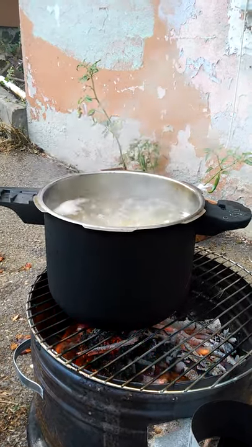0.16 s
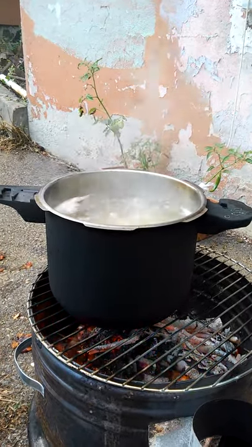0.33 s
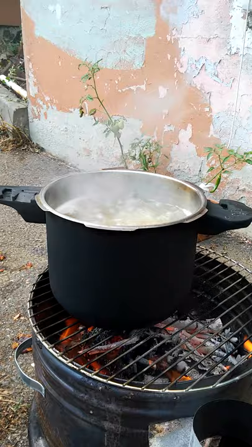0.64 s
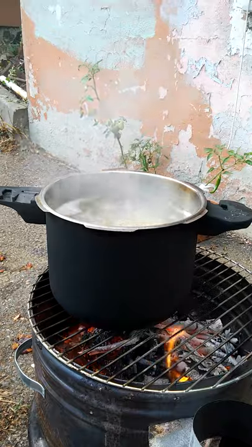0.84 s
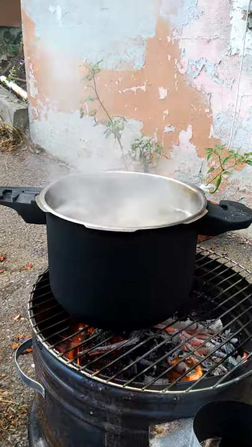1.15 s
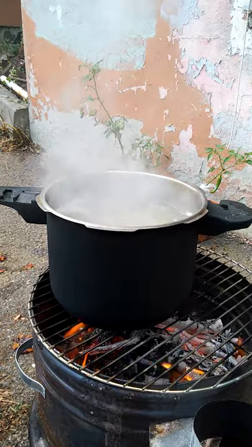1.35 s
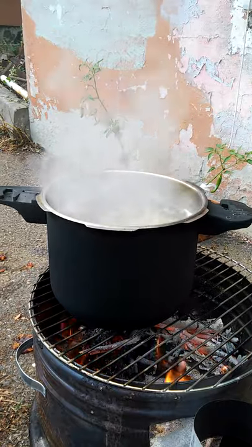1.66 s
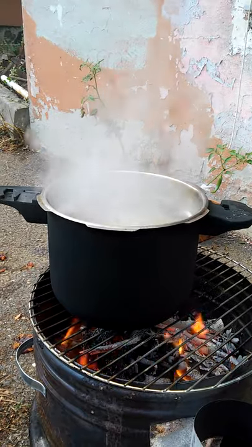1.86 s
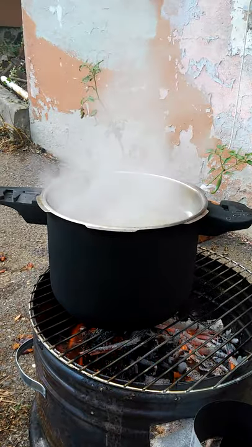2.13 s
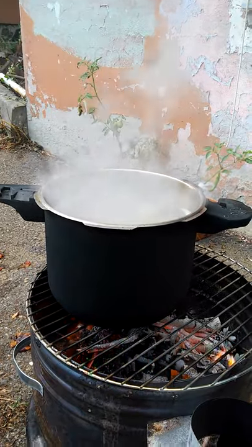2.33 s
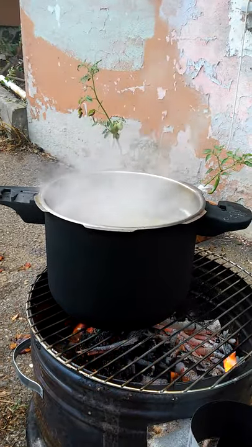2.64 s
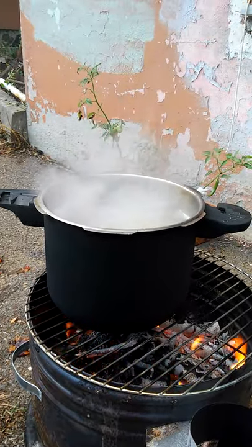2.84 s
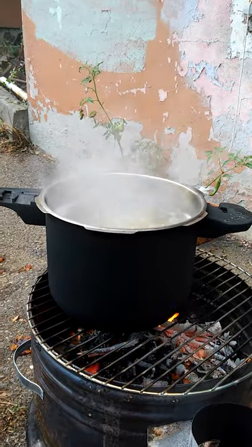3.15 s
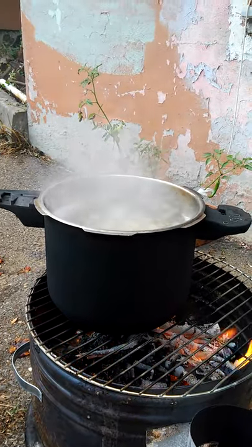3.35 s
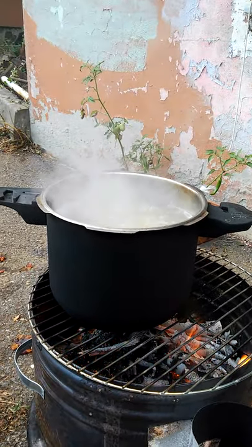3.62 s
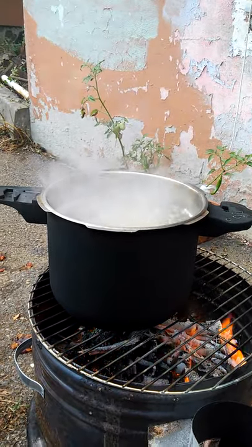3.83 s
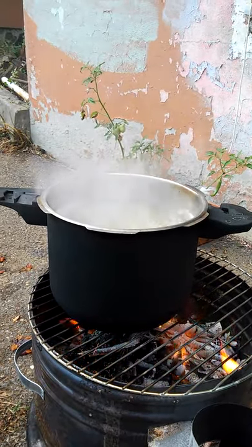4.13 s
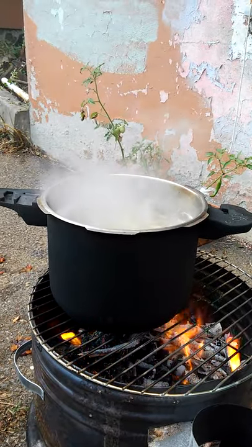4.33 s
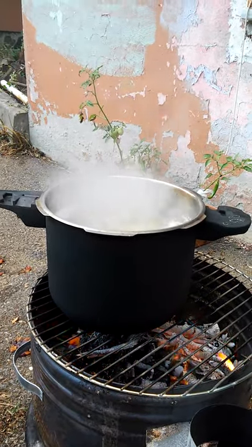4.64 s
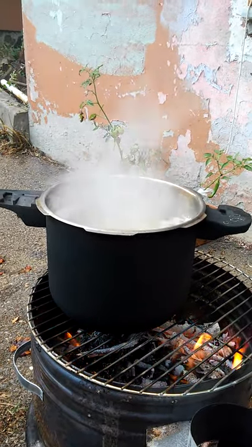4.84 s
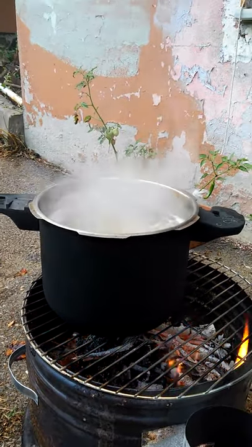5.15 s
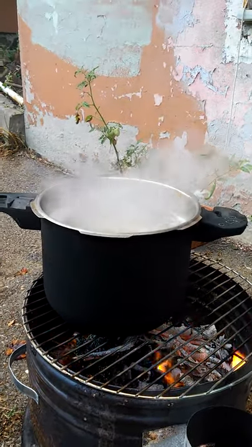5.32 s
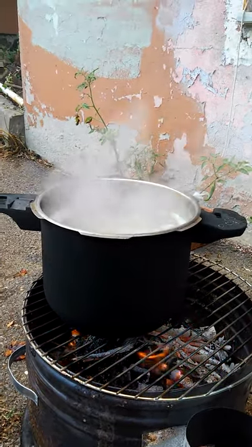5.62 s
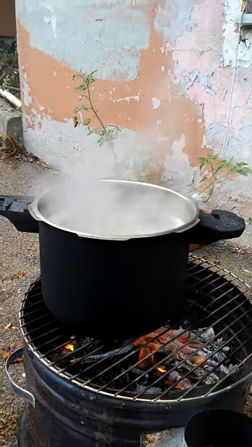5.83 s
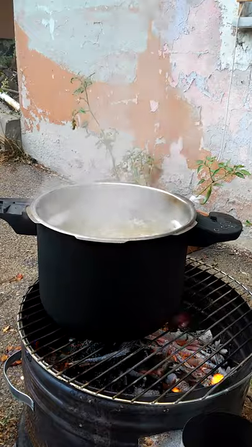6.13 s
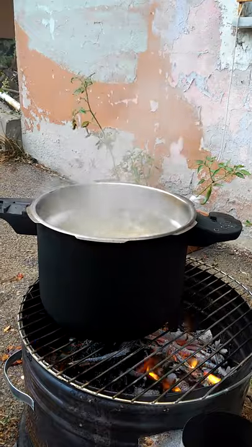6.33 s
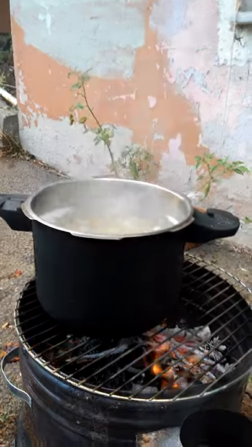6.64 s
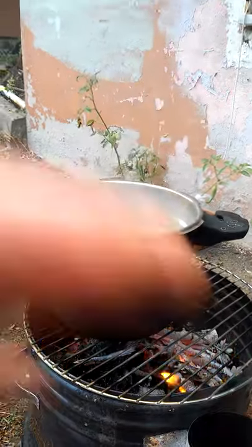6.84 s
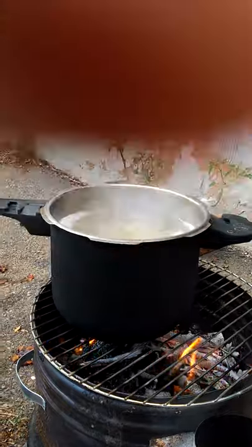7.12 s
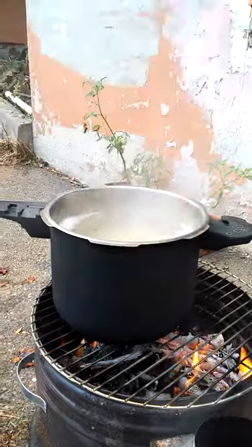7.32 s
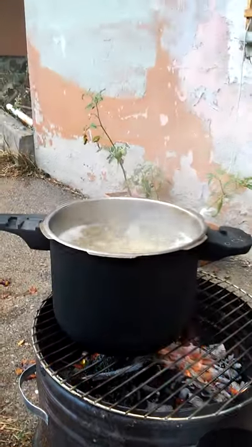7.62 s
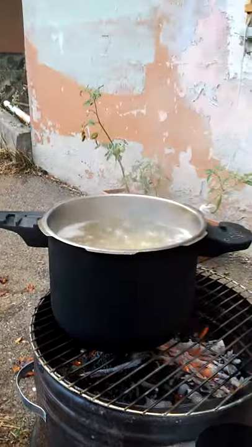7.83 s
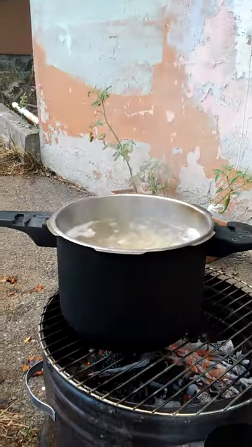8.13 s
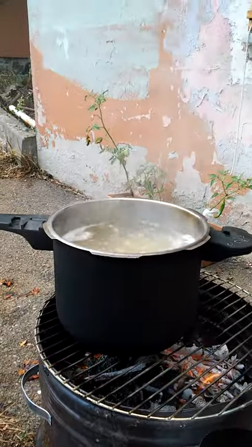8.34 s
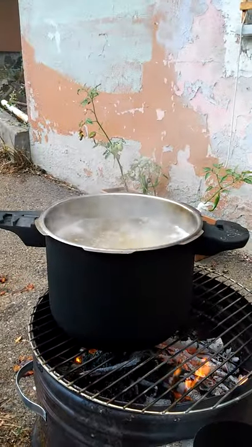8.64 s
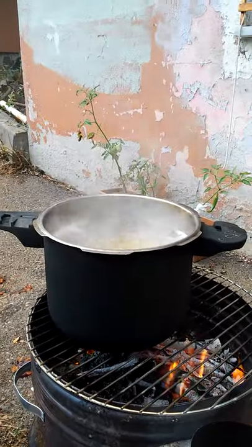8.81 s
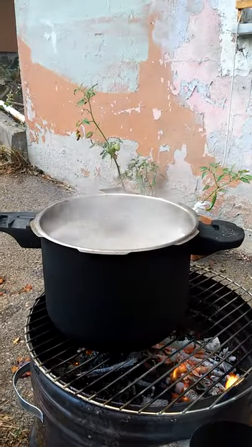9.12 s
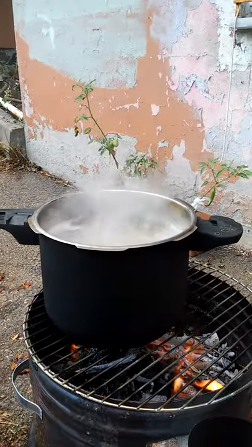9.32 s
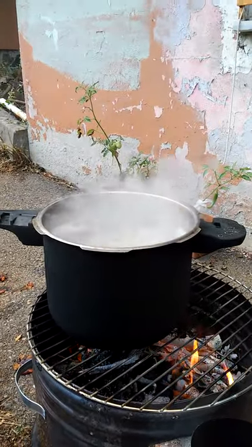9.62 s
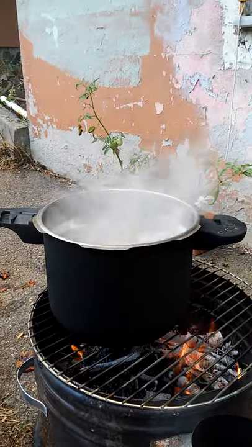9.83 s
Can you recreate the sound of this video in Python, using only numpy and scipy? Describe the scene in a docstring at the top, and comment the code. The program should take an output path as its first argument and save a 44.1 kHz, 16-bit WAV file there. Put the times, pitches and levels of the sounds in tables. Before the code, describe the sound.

Heard up close in a yard, embers sizzle and snap under a gently bubbling pot while an insect chirrs thinly. The grill grate clanks at the start, and soft thumps follow. Midway the wood gives faint whistles and a sharp crack. Then come another hard crack and short hissing jets of steam over a faint distant engine, before a loud pop resonates in the steel drum.

```python
"""A wood and charcoal fire in a steel drum outdoors, under a grate and a boiling pot, heard close by.
At first the grate clanks with a low thud; soft low thumps follow. Throughout, flames and water roar
softly, bubbles ring, embers sizzle and crack, and an insect chirrs with its wings. Midway, gas whistles
thinly from the wood; later steam spurts from its pores while an engine drones far off.
Near the end a loud pop knocks the drum and excites its resonances."""
import sys
import numpy as np
from scipy import signal
from scipy.fft import rfft, irfft, next_fast_len
from scipy.io import wavfile
from scipy.ndimage import uniform_filter1d, map_coordinates

SR = 44100
rng = np.random.default_rng(int(sys.argv[2]) if len(sys.argv) > 2 else 0)


def log_audio(samples):
    """Write samples as a 16-bit WAV file to the path given in sys.argv[1]."""
    # one column per channel
    frames = np.atleast_2d(samples).T
    # limit to full scale, then quantise
    limited = np.clip(frames, -1, 1)
    pcm = np.round(limited * 32767).astype(np.int16)
    wavfile.write(sys.argv[1], SR, pcm)


N = 439677

# The background roar and sizzle swell and sink together.
# Each row: time in seconds, roar in dB, sizzle in dB.
BACKGROUND_LEVELS = [(0.0, -62, -62), (0.14, -57, -59), (0.36, -59.5, -62), (0.6, -70, -71.5),
                     (1.1, -74.5, -76), (1.45, -72.5, -74.5), (1.8, -73.5, -78.5), (2.19, -69.5, -73),
                     (2.52, -68, -68.5), (2.95, -70, -72), (3.28, -64, -64), (3.58, -64, -69),
                     (3.95, -71, -72.5), (4.3, -65, -63), (4.55, -64, -62.5), (5.38, -70, -71),
                     (5.8, -67.5, -66.5), (6.07, -62.5, -61.5), (6.45, -67.5, -67), (7.05, -64, -60.5),
                     (7.5, -64.5, -62.5), (7.75, -59, -56.5), (8.05, -60, -61), (8.42, -66.5, -62.5),
                     (8.66, -62.5, -60), (8.86, -68, -68), (9.24, -66.5, -65), (9.77, -65.5, -65.5),
                     (9.97, -55.5, -58.5)]


def amp(db):
    """Amplitude ratio of a level in decibels."""
    return 10 ** (np.asarray(db) / 20)


def unit(x):
    """Normalisation to rms 1."""
    return x / np.sqrt(np.mean(x ** 2) + 1e-20)


def peak(x):
    """Normalisation to peak 1."""
    return x / np.abs(x).max()


def along(points, hz):
    """Interpolation of (Hz, value) points on a logarithmic frequency axis."""
    f, values = np.transpose(points)
    return np.interp(np.log(hz + 1), np.log(f + 1), values)


def curves(rows):
    """Linear interpolation in time: one value per sample for each column after the first."""
    times, *columns = np.transpose(rows)
    return [np.interp(np.arange(N) / SR, times, column) for column in columns]


def wobble(rate):
    """Smooth random modulation: a spline through `rate` knots a second."""
    knots = rng.standard_normal(int(N * rate / SR) + 4)
    grid = np.arange(0, N + 16, 16)
    return np.interp(np.arange(N), grid, map_coordinates(knots, [grid * rate / SR]))


def band(f, centre_hz, width_hz):
    """Frequency response of a damped resonator."""
    return 1j * f * width_hz / (centre_hz * centre_hz - f * f + 1j * f * width_hz)


def filtered(x, response):
    """Linear filtering: the spectrum of x times a frequency response."""
    size = next_fast_len(x.shape[-1] + min(x.shape[-1] // 2, 8192))
    return irfft(rfft(x, size) * response(np.fft.rfftfreq(size, 1 / SR)), size)[..., :x.shape[-1]]


def add(track, start, sound):
    """Superposition of a sound on a track, from `start` seconds."""
    part = track[max(round(start * SR), 0):][:len(sound)]
    part += sound[:len(part)]


def rush(spectrum, patchy_db, spit_db):
    """Coloured noise of rms 1, modulated by a fast sputter and by patches in time and frequency."""
    sputter = rng.standard_normal(N) * amp(spit_db * wobble(900))
    cells = signal.stft(sputter, nperseg=512)[2]
    patches = uniform_filter1d(rng.standard_normal(cells.shape), size=6, axis=0)
    patches = uniform_filter1d(patches, size=12, axis=1)
    noise = signal.istft(cells * amp(patchy_db * unit(patches)), nperseg=512)[1][:N]
    return unit(filtered(noise, lambda hz: amp(along(spectrum, hz))))


def ring(modes, t, rise_s, blur_hz):
    """A sum of damped modes; phase diffusion broadens each spectral line."""
    phase = 2 * np.pi * rng.random((len(modes), 1))
    drift = np.cumsum(rng.standard_normal((len(modes), len(t))), axis=1) * np.sqrt(2 * np.pi * blur_hz / SR)
    hz, db, t60 = np.transpose(modes)[:, :, None]
    partials = amp(db - 60 * t / np.maximum(t60, .005)) * np.sin(2 * np.pi * hz * t + phase + drift)
    return partials.sum(axis=0) * (1 - np.exp(-t / rise_s))


def engine():
    """A distant engine: one low tone, randomly modulated in amplitude and frequency."""
    # Each row: time in seconds, pitch in Hz, level in dB.
    drone = [(6.9, 57.2, -83), (7.1, 56.8, -63), (7.4, 56.9, -65.5), (7.7, 57, -57), (8, 56.95, -63),
             (8.3, 57.1, -64), (8.7, 56, -65), (8.95, 55.8, -84)]
    hz, db = curves(drone)
    return amp(db + 3.2 * wobble(19)) * np.sin(2 * np.pi * np.cumsum(hz + 3 * wobble(12)) / SR)


def insect():
    """Amplitude modulation: wing strokes chop a high hiss, which swells once a syllable."""
    # Each row: time in seconds, level at the height of a syllable in dB.
    chirr = [(0.0, -52.5), (0.3, -54.5), (0.65, -69.5), (1.2, -72), (1.8, -71.5), (2.1, -64.5), (2.6, -62),
             (2.8, -65), (3.1, -57), (3.52, -53), (3.95, -66), (4.07, -66.5), (4.13, -57), (4.5, -53),
             (5.1, -60), (5.6, -59.5), (6.04, -49.5), (6.3, -55.5), (6.9, -52.5), (7.8, -50), (8.4, -51.5),
             (8.7, -57), (8.93, -75), (8.98, -55.5), (9.44, -52), (9.75, -53), (9.97, -48)]
    # Each row: time in seconds, syllables sung so far.
    syllables = [(0.14, 0), (0.79, 4), (1.41, 8), (2.05, 12), (2.92, 18), (3.85, 24), (4.12, 26), (4.9, 31),
                 (5.6, 35), (6.04, 38), (7.53, 48), (8.2, 52), (9.0, 57), (10.025, 64)]
    # The hiss. Each row: frequency in Hz, spectral level in dB.
    wings = [(9000, -40.5), (12500, -21), (14000, -10), (15000, -1.5), (15600, 3), (15900, -11)]
    strokes = np.cos(2 * np.pi * np.cumsum(125 + 6 * wobble(8)) / SR)
    depth_db = 9 * np.abs(.85 + 0.37 * wobble(5.5))
    pauses = np.abs(np.sin(np.pi * curves(syllables)[0])) ** 3
    hiss = unit(amp(1.4 * strokes) * rush(wings, patchy_db=1.5, spit_db=0.5))
    return amp(curves(chirr)[0] - depth_db * pauses) * hiss


def roar_and_sizzle():
    """Broadband noise in three bands: flames rumble, water roars in the pot, embers sizzle."""
    # Three spectra. Each row: frequency in Hz, spectral level in dB.
    flames = [(12, -30), (20, -6), (28, -9), (52, 0), (90, -4), (150, -10), (210, -31), (350, -120)]
    water = [(35, -27), (60, -5), (110, -2), (170, -2), (250, -5), (450, -4.5), (560, -8), (1040, -10),
             (1440, -18.5), (2470, -21.5), (4410, -23.5), (6000, -26.5), (7800, -49.5), (13200, -120)]
    coals = [(3500, -40.5), (5300, -12), (6300, -5.5), (7500, -1), (9000, -3.5), (12000, -2), (14000, 0.5),
             (15800, -8)]
    # Each row: time in seconds, rumble relative to the roar in dB.
    flutter = [(0, -8), (0.2, -14), (0.5, -6), (1.6, -3.5), (2.3, -8), (2.9, -13), (3.6, -3.5), (4.0, -7),
               (4.5, -4), (5.8, -5.5), (6.2, -9), (7.5, -10), (8.0, -3), (8.6, -3), (9.1, -6.5),
               (9.97, -12)]
    roar_db, sizzle_db = curves(BACKGROUND_LEVELS)
    rumble_db = roar_db + curves(flutter)[0]
    rumble = amp(rumble_db + 1.7 * wobble(6.2)) * rush(flames, patchy_db=0.1, spit_db=0.5)
    roar = amp(roar_db + 0.87 * wobble(12)) * rush(water, patchy_db=0.16, spit_db=0.73)
    sizzle = amp(sizzle_db + 1.2 + 1.6 * wobble(20)) * rush(coals, patchy_db=1.0, spit_db=1.4)
    return rumble + roar + sizzle


def bubbles():
    """Steam bubbles burst in the pot, each a damped oscillator of rising pitch."""
    # Each row: start in seconds, level in dB, initial pitch in Hz.
    big = [(3.015, -54, 175), (3.075, -51, 160), (3.2, -55, 180), (3.285, -50, 138), (3.355, -53, 190),
           (3.47, -54, 125), (3.6, -52, 150), (3.75, -48, 155)]
    typical_hz, life_cycles = 170.3, 6.1
    out, roar_db = np.zeros(N), curves(BACKGROUND_LEVELS)[0]
    small = [(when * N / SR, roar_db[int(when * N)] + 5 + 7 * size,
              typical_hz * 2 ** (2.2 * pitch ** 2 - .6)) for when, size, pitch in rng.random((110, 3))]
    for start, db, hz in big + small:
        cycles = np.arange(SR // 10) / SR * hz
        envelope = amp(db) * (1 - np.exp(-cycles)) * np.exp(-3 * cycles / life_cycles)
        add(out, start, envelope * np.sin(2 * np.pi * cycles * (1 + .025 * cycles)))
    return out


def low_thumps():
    """Heavily damped oscillations of a cycle or two: the thud of the grate, then soft low thumps."""
    # Each row: start in seconds, level in dB, pitch in Hz.
    thumps = [(.038, -26, 220), (.972, -38.5, 89), (1.25, -41.5, 45), (1.485, -48.5, 64.7),
              (3.746, -38.5, 290), (8.101, -30, 284), (8.478, -36.5, 105), (8.52, -50, 75)]
    out = np.zeros(N)
    for start, db, hz in thumps:
        cycles = np.arange(int(6 * SR / hz)) * hz / SR
        add(out, start, amp(db) * cycles * np.exp(-1.4 * cycles) * np.sin(2 * np.pi * cycles))
    return out


def whistles():
    """Gas leaving the wood sounds faint narrow-band tones that swell and fade."""
    # Each row: start in seconds, length in seconds, pitch in Hz, level in dB.
    tones = [(3.4, .15, 4050, -81), (6.03, 0.14, 4060, -74)]
    out = np.zeros(N)
    for start, length, hz, db in tones:
        t = np.arange(round(length * SR)) / SR
        swell = amp(db) * np.sin(np.pi * t / length)
        add(out, start, swell * ring([(hz, 0, 9)], t, rise_s=.01, blur_hz=70))
    return out


def steam_jets():
    """Jet noise: pores in the wood open and shut on a hiss with a low spill and a fine top."""
    # Each row: start and length in seconds, first and last level in dB, relative spill and top in dB.
    spurts = [(6.622, .068, -56, -53.5, -23, -12), (6.69, 0.16, -61, -66.5, -20, -10),
              (6.979, .25, -58, -63, -15, -9.5), (7.488, .045, -53, -64, -19, -7),
              (7.587, 0.1083, -36, -34, -23.5, 1), (7.694, .056, -32.5, -36, -21, 1),
              (7.747, .155, -44.5, -41, -23.5, 2.5), (7.91, .2, -59.5, -68.5, -24, -3),
              (8.435, .06, -53.5, -59, -17, 1), (8.49, .075, -55, -49.5, -23, -1),
              (8.56, .045, -48, -35.5, -22.5, -2), (8.599, 0.084, -35, -32, -18, -2.5),
              (8.695, 0.09, -55, -67, -22, -6), (9.34, .11, -63.5, -65.5, -18, -14)]
    # Three spectra. Each row: frequency in Hz, spectral level in dB.
    steam_band = [(3500, -45.5), (5000, -20.5), (5700, -16), (6500, -5), (7600, -1.5), (8500, -4.5),
                  (9500, -9.5), (11000, -33)]
    spill_band = [(900, -29), (1500, -13.5), (2300, -13), (3300, -1.5), (4100, -9.5), (5000, 0),
                  (6000, -31)]
    top_band = [(7500, -35.5), (9000, -3.5), (10300, -4.5), (11500, -1.5), (13000, -4), (14600, 0),
                (15800, -3.5)]
    open_s, shut_s = 0.008, 0.0031
    flow, spill, top = np.zeros((3, N))
    for start, length, first_db, last_db, spill_db, top_db in spurts:
        t = np.arange(round((length + 8 * shut_s) * SR)) / SR
        opening = np.tanh((t / open_s) ** 2) * np.exp(-np.maximum(t - length, 0) / shut_s)
        spurt = amp(first_db + (last_db - first_db) * t / length) * opening
        add(flow, start, spurt)
        add(spill, start, amp(spill_db) * spurt)
        add(top, start, amp(top_db) * spurt)
    hiss = flow * rush(steam_band, patchy_db=2.0, spit_db=1.5)
    hiss += spill * rush(spill_band, patchy_db=3.5, spit_db=1.5)
    return amp(1.2 * wobble(40)) * (hiss + top * rush(top_band, patchy_db=2.5, spit_db=1.5))


def yard(x):
    """Diffuse reverberation: convolution with a short noise tail whose treble dies first."""
    # Each row: frequency in Hz, time to fall 60 dB in seconds.
    decay_times = [(300, 0.34), (1000, 0.33), (3000, 0.21), (8000, 0.18), (15000, 0.069)]
    hz, t, cells = signal.stft(rng.standard_normal(SR // 2), SR, nperseg=256)
    tail = signal.istft(cells * amp(-60 * t / along(decay_times, hz)[:, None]), SR, nperseg=256)[1]
    return signal.fftconvolve(x, tail / np.linalg.norm(tail))[:N]


def grate_clank():
    """Impact excitation: a few quick contacts set the modes of the grate ringing."""
    # Each row: frequency in Hz, level in dB, time to fall 60 dB in seconds.
    modes = [(490, -35, 1.4), (740, -16, 0.24), (952, -11, 0.26), (1023, -5.5, 0.32), (1114, -17, 0.53),
             (1697, -30, 0.41), (1808, -25.5, 0.36), (1970, -31, 0.44), (2330, -14, 0.21),
             (2630, -18.5, 0.24), (2726, -15, 0.25), (2863, -22, 0.18), (3016, -5.5, 0.19),
             (3266, -12.5, 0.23), (3451, -28, 0.3), (3510, -14, 0.22), (3630, -17, 0.243),
             (4290, -10.5, 0.087), (4470, -20, 0.19), (4760, -11, 0.089), (5260, -13.5, 0.19),
             (5320, -8, 0.084), (6170, -6.5, 0.076), (6400, -11.5, 0.12), (7160, -13, 0.2),
             (8177, -15, 0.088)]
    # Each row: start in seconds, level in dB.
    contacts = [(0.0359, -28.5), (.045, -26), (.053, -31), (0.063, -44)]
    out, t = np.zeros(N), np.arange(SR // 2) / SR
    for start, db in contacts:
        noise = filtered(rng.standard_normal(len(t)), lambda f: band(f, 3497, 6000))
        clatter = 0.25 * amp(-60 * t / 0.1394) * noise
        add(out, start, amp(db) * (ring(modes, t, rise_s=0.00048, blur_hz=80) + clatter))
    return out


def drum_knock():
    """Forced response: the impulse and rattle of one pop drive the resonances of the steel drum."""
    # Each row: centre in Hz, width in Hz, level in dB at a width of 400 Hz.
    resonances = [(312, 41, -4), (836, 110, -9), (990, 170, -4), (1794, 98, -12), (2450, 590, -20),
                  (2950, 300, -20), (5410, 700, -1.5), (6080, 800, -0.5), (6880, 670, -8.5)]
    start_s, blow_db = 9.8238, -14
    blow, t = np.zeros(N), np.arange(SR // 2) / SR
    decay = 1.6 * amp(-60 * t / 0.059) + amp(-6 - 60 * t / 0.18)
    rattle = filtered(decay * rng.standard_normal(len(t)), lambda f: band(f, 4400, 7000))
    impulse = -22.5 * (t == 0)
    add(blow, start_s, amp(blow_db) * (impulse + rattle))
    return filtered(blow, lambda f: sum(amp(db) * 400 / width * band(f, hz, width)
                                        for hz, width, db in resonances))


def crack(hz, wood_hz, wood_db, tail_db):
    """A transient with a brief woody resonance, reflections off grate, pot and wall, then scattering."""
    # The scattered treble. Each row: frequency in Hz, spectral level in dB.
    tail_band = [(1500, -46), (3000, -27), (4800, -25), (6000, -7.5), (7500, 0.5), (10000, -10.5),
                 (15500, -15)]
    t = np.arange(SR // 12) / SR
    burst = (1 - np.exp(-(t / .0011) ** 6)) * amp(-60 * t / .006) * rng.standard_normal(len(t))
    # small embers give no low tones
    thin = lambda f: band(f, 10380, 20000) ** 4 * (f / 5300) ** 8 / (1 + (f / 5300) ** 8)
    snap = peak(filtered(burst, lambda f: thin(f) * (0.23 + band(f, hz, 5000))))
    drive = np.abs(burst) * np.sin(2 * np.pi * wood_hz * t) + 1.3 * burst
    wood = filtered(drive, lambda f: band(f, wood_hz, 4200) * (.26 + band(f, wood_hz, 330)))
    wood = amp(wood_db) * peak(wood)
    grains = amp(2.2 * rng.standard_normal(len(t) // 64 + 1)).repeat(64)[:len(t)]
    grit = unit(filtered(grains * rng.standard_normal(len(t)), lambda f: amp(along(tail_band, f))))
    scatter = (1 - np.exp(-(t / 0.0017) ** 2)) * amp(-60 * t / 0.1) * grit
    sound = snap + wood + amp(tail_db) * scatter
    dull = filtered(snap, lambda f: 0.22 + 1.4 * band(f, 7200, 3500) ** 2) + 1.4 * wood
    for delay_s, db in [(.0018, 13.5), (.0064, 12), (.012, 7), (.02, 0)]:
        smear = rng.standard_normal(round(.28 * delay_s * SR) + 1)  # rough walls spread each echo
        echo = signal.fftconvolve(dull, smear / np.linalg.norm(smear))
        add(sound, delay_s, amp(db + tail_db + rng.normal(0, 1.74)) * echo)
    return peak(sound)


def embers():
    """Impulsive sources: clear cracks over a random patter whose level follows the sizzle."""
    # Each row: start in seconds, peak in dB, pitch in Hz, wood ring in Hz, relative ring and tail in dB.
    cracks = [(0.1624, -37, 9600, 3600, -20.5, -13.5), (0.1892, -39.5, 11570, 2900, -19, -23.5),
              (0.2138, -38, 9200, 4500, -26, -29), (0.2344, -36, 10600, 3200, -32, -26),
              (0.244, -39.5, 10800, 4900, -22, -26.5), (0.2942, -20, 13200, 3300, -29, -24),
              (0.3525, -21, 9990, 5150, -23, -21), (0.4319, -41.5, 10800, 4400, -31, -20),
              (0.441, -40.5, 10800, 4700, -35, -30.5), (0.469, -44.5, 10700, 4540, -30, -26),
              (0.497, -45, 10700, 4580, -20, -18.5), (0.6991, -32.5, 10300, 5180, -27, -19.5),
              (0.7735, -40, 11800, 4900, -35.5, -16), (0.7805, -32.5, 12900, 4360, -38, -24),
              (2.3045, -49.5, 8800, 3400, -26, -15), (2.331, -45, 10930, 3400, -28, -28),
              (2.518, -36.5, 8300, 4700, -35, -23), (3.1212, -36, 13600, 4300, -37, -26),
              (3.379, -42, 12300, 3800, -38, -34), (3.8254, -47.5, 11800, 3500, -27, -18),
              (3.9477, -38, 11400, 4300, -45, -26), (4.1912, -26.5, 8750, 4600, -18, -16.5),
              (4.2869, -41, 12200, 3500, -36, -26), (4.3696, -38.5, 12500, 4100, -40, -21),
              (4.394, -39, 10800, 4500, -33, -19), (4.485, -28.5, 8600, 5130, -21.5, -22.5),
              (4.5629, -29, 10700, 5100, -37, -28), (4.9496, -41, 7900, 4220, -35, -20),
              (5.0615, -42, 10460, 4100, -27, -18), (5.591, -32, 11600, 4870, -27.5, -22),
              (5.6205, -38, 13330, 4800, -36, -21), (5.6778, -43.5, 11200, 4300, -37, -23),
              (5.8423, -44.5, 10200, 4400, -32, -21.5), (5.8635, -32, 9000, 3300, -37, -18),
              (5.9113, -8, 13400, 3990, -25, -23), (6.033, -35.5, 12100, 4200, -38, -23),
              (6.1731, -39, 12100, 3400, -35, -30), (6.246, -41.5, 10200, 3800, -32, -16),
              (6.2542, -24.5, 12300, 4200, -30, -29), (6.2704, -31, 10800, 4100, -35, -36),
              (6.3331, -36.5, 12400, 3700, -39, -36), (7.1173, -37, 12800, 4600, -34, -24),
              (7.1336, -39.5, 10700, 4500, -31, -22), (7.3414, -38.5, 12900, 3610, -34, -29.5),
              (7.3631, -27.5, 11800, 4100, -47, -26.5), (7.5155, -30.5, 13230, 3880, -41, -20.5),
              (7.5335, -15.5, 11480, 4370, -41, -17), (7.5377, -0.5, 12300, 4900, -44.5, -33.5),
              (7.798, -26, 9900, 4490, -40, -15), (7.9811, -36, 10900, 3180, -40, -24),
              (8.0203, -36, 11700, 4000, -33, -32), (8.042, -36.5, 7300, 4390, -38, -17.5),
              (8.0531, -40.5, 8700, 3800, -28, -31), (8.157, -44, 10200, 4830, -31, -18),
              (8.1691, -44, 7500, 4000, -29, -24), (8.258, -28, 7380, 4180, -29, -15.5),
              (8.5502, -34, 10000, 4180, -39, -16), (9.021, -36.5, 12450, 3600, -41, -20),
              (9.0409, -45, 12400, 3700, -36, -21), (9.2036, -44, 11800, 3300, -33.5, -30),
              (9.2969, -43.5, 13080, 3800, -38, -33), (9.5462, -38, 12700, 4000, -30, -19),
              (9.6484, -40.5, 12400, 3290, -36, -33), (9.8226, -7, 13200, 4890, -15, -21),
              (9.9619, -28, 12480, 4600, -27, -36)]
    out, sizzle_db = np.zeros(N), curves(BACKGROUND_LEVELS)[1]
    patter = [(when * N / SR, sizzle_db[int(when * N)] + 11.5 + 6.5 * size,
               6500 + 7000 * pitch, 4000, -30.5, -25.5) for when, size, pitch in rng.random((100, 3))]
    for start, db, *colour in cracks + patter:
        add(out, start, amp(db) * crack(*colour))
    return out


def scene():
    """Superposition of all sources in mono; the grate and the drum reverberate in the yard."""
    mix = roar_and_sizzle() + bubbles() + engine() + insect() + steam_jets() + whistles() + embers()
    grate, drum = grate_clank(), drum_knock()
    steel = grate + amp(-8) * yard(grate) + drum + amp(-20) * yard(drum)
    return (mix + steel + low_thumps())[None]


def record(dry):
    """Soft saturation rounds the loudest peaks; a low-pass filter limits the band."""
    ceiling, top_hz = .95, 15790
    soft = dry / (1 + np.abs(dry / ceiling) ** 8) ** (1 / 8)
    return filtered(soft, lambda hz: hz < top_hz)


dry = scene()
out = record(dry)
log_audio(out)
```